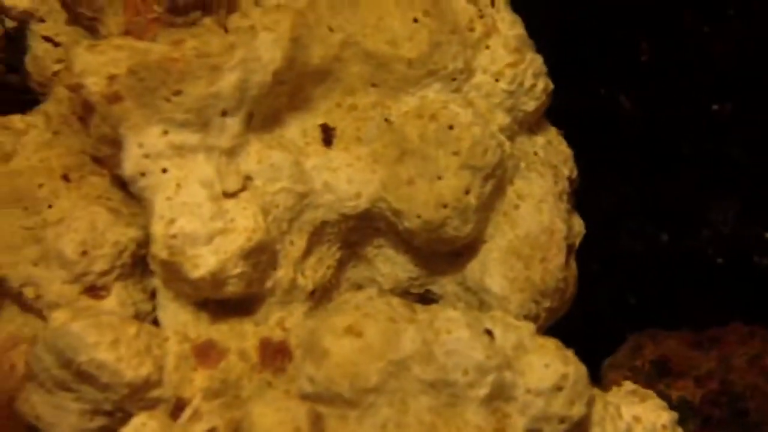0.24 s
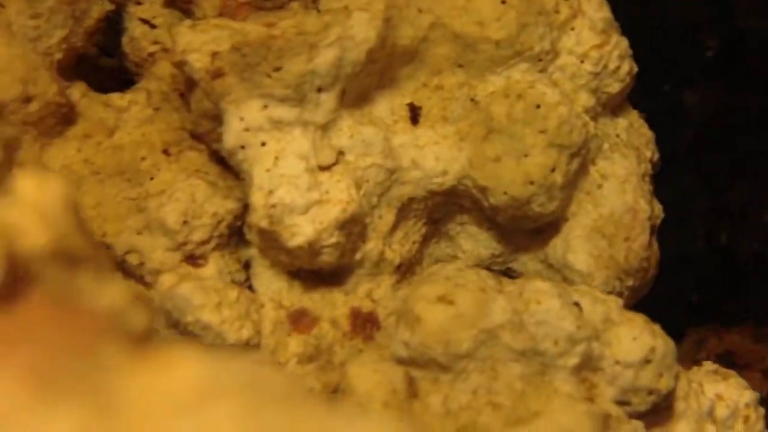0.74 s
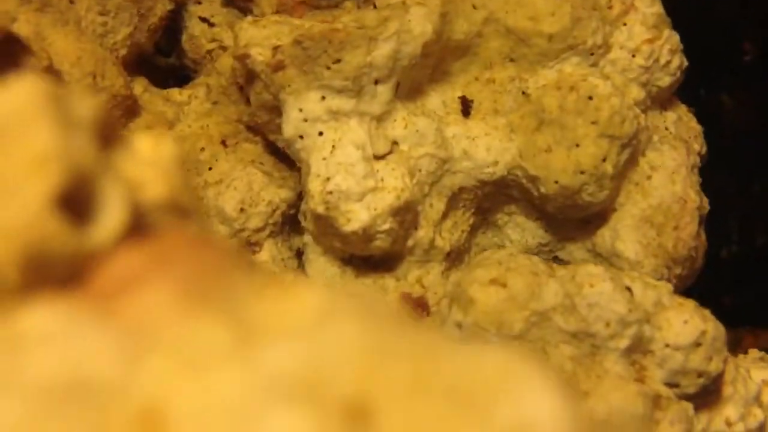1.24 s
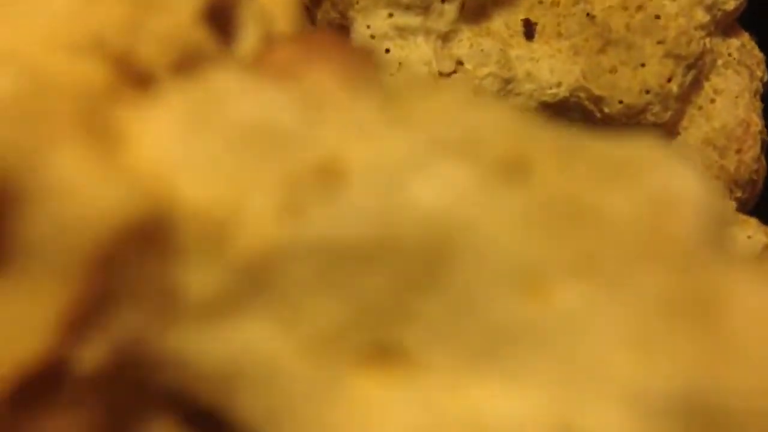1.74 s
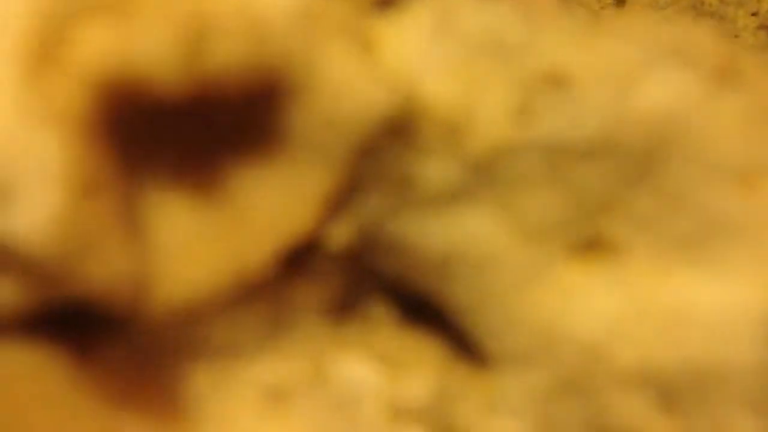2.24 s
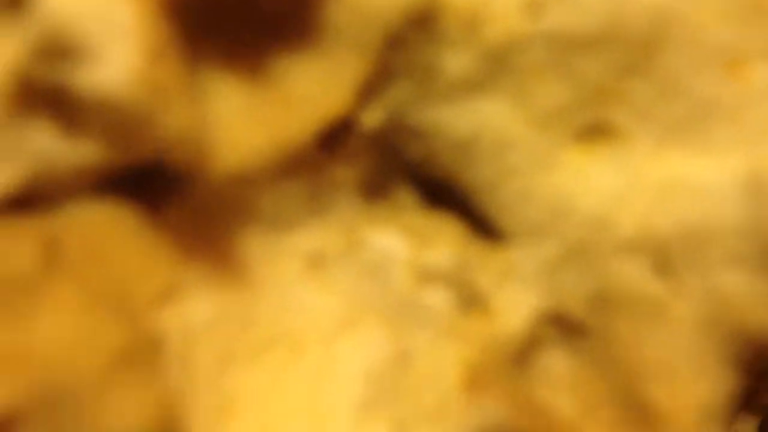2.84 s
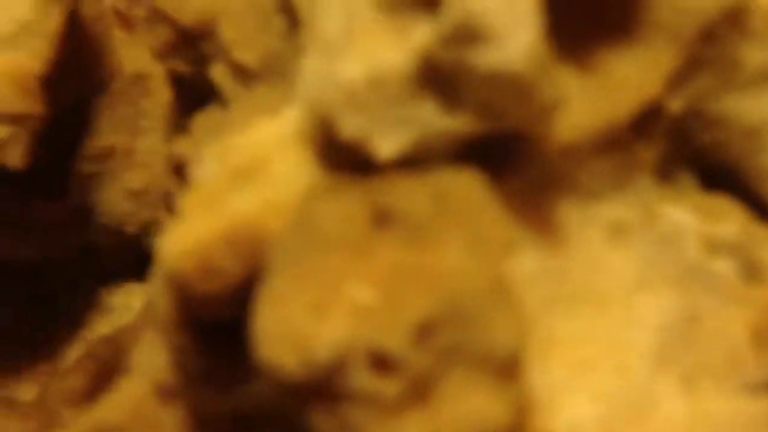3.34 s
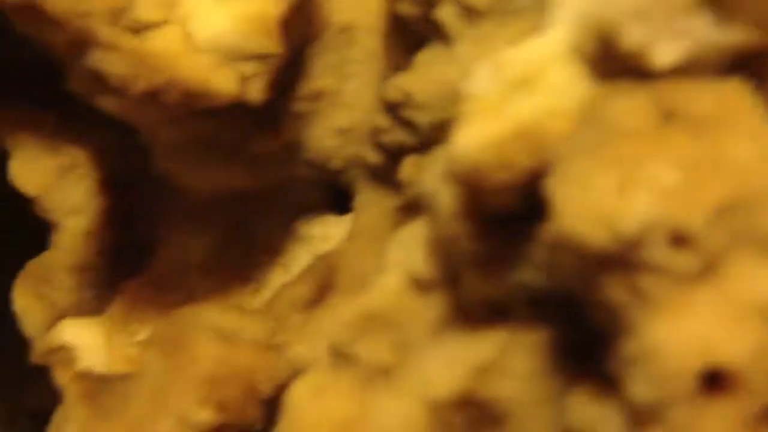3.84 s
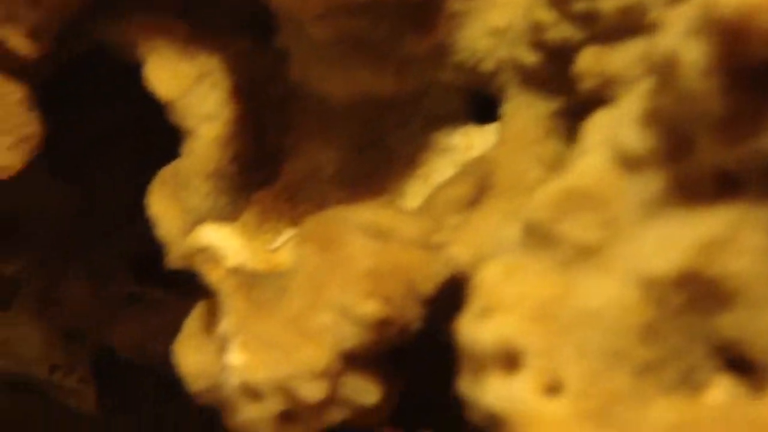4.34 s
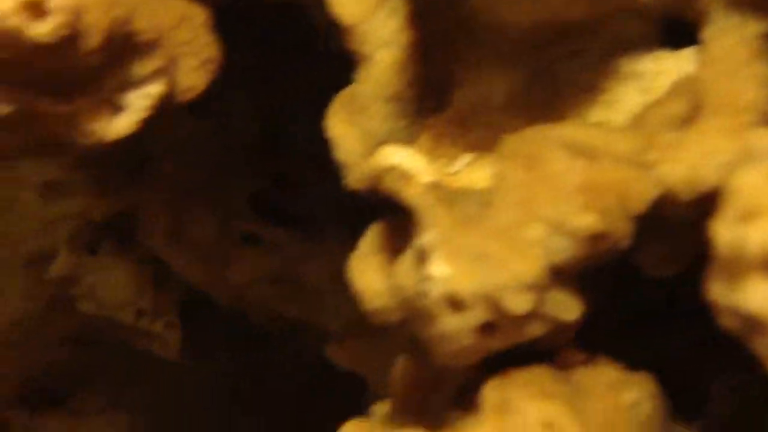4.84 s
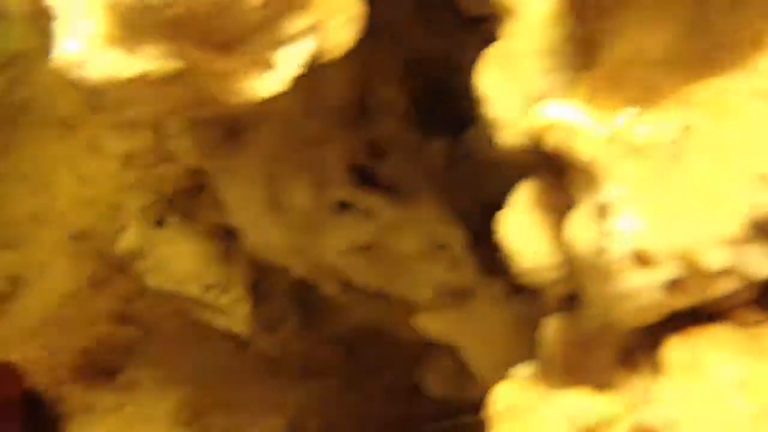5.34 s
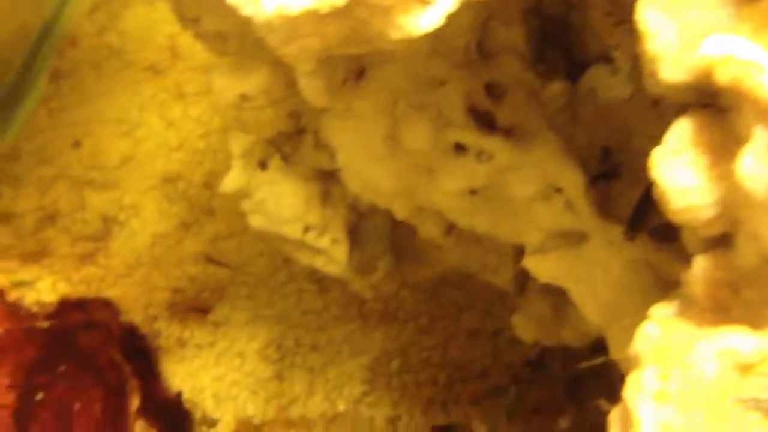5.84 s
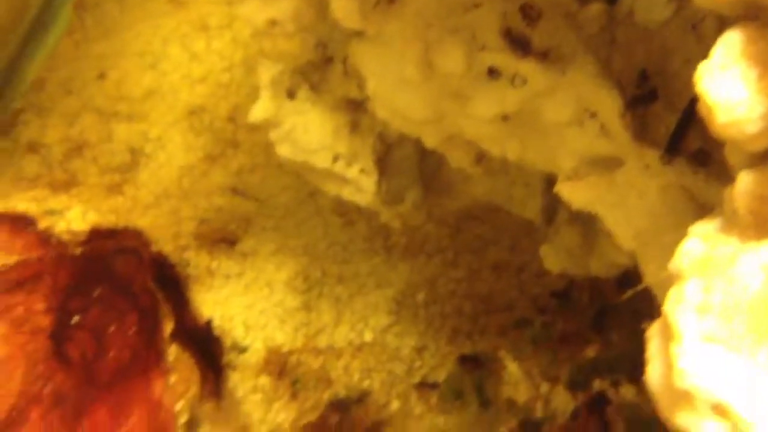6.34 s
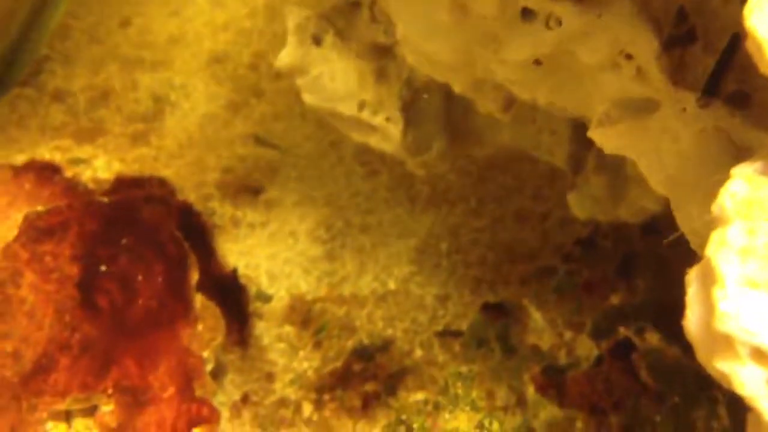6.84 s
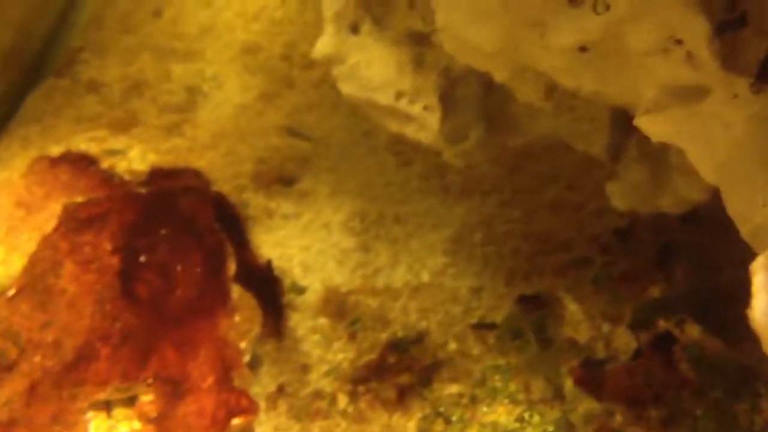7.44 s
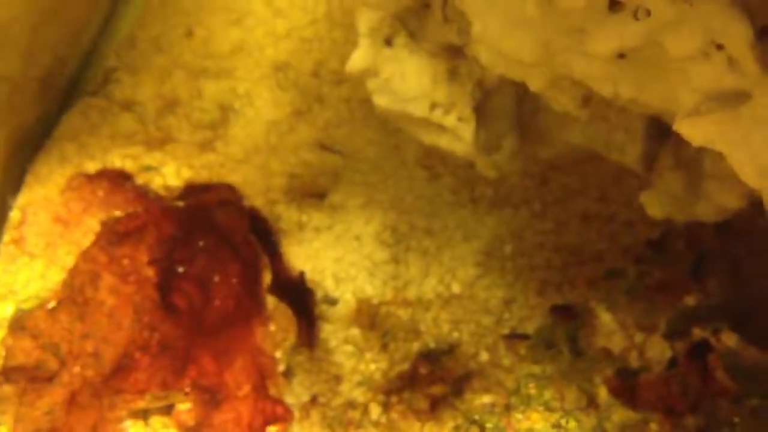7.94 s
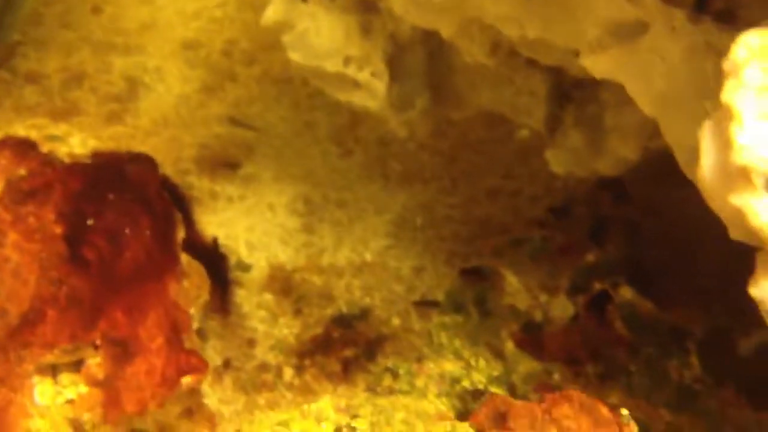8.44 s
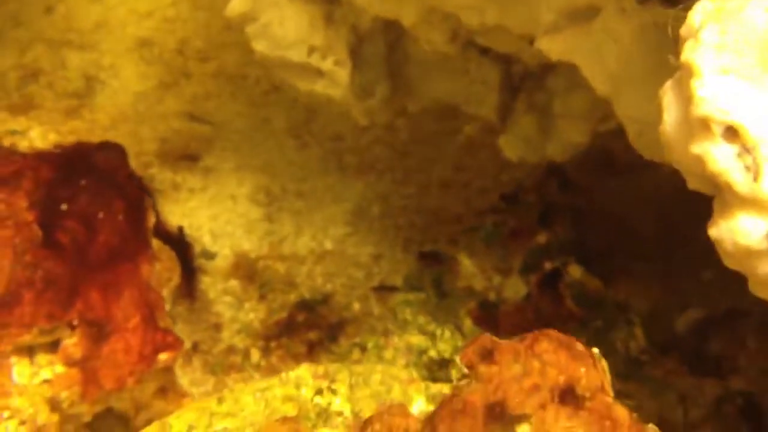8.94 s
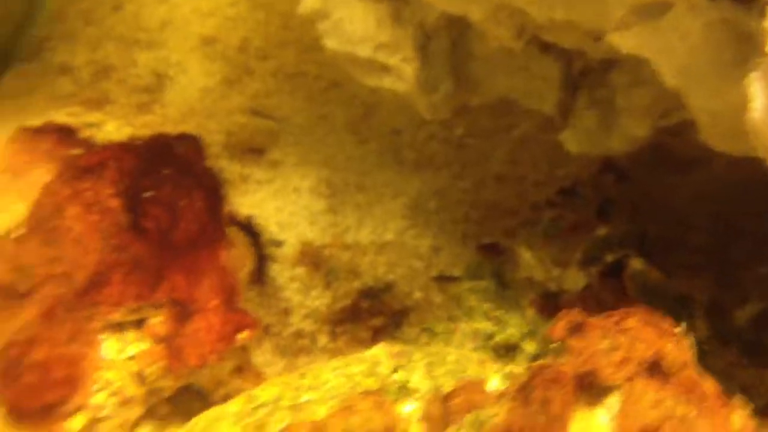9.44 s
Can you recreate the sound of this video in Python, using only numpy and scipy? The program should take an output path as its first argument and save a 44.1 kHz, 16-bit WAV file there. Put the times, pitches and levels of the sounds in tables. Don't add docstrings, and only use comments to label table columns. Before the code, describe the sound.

Inside a rock-filled water tank, a steady low mains hum and dull rushing flow surround a sealed underwater microphone. A rotor ticks very rapidly, with irregular sharper clicks. The water gradually gets louder and fuller, a few gurgles and bubbly knocks appear midway, and in the last second hollow, thumping turbulence drums hard on the housing.

```python
import sys
import numpy as np
from scipy import signal
from scipy.fft import rfft, irfft, next_fast_len
from scipy.io import wavfile
from scipy.ndimage import uniform_filter1d, map_coordinates

SR = 44100
rng = np.random.default_rng(int(sys.argv[2]) if len(sys.argv) > 2 else 0)


def elevation(decibels):
    levels = np.asarray(decibels, float)
    return 10 ** (levels / 20)


def transcribe(u):
    v = np.clip(np.atleast_2d(u).T, -1, 1)
    q = np.round(v * 32767).astype(np.int16)
    wavfile.write(sys.argv[1], SR, q)


N = 426888

MAINS_HZ = 59.9945
MAINS_START = 0.2
POCKET_HZ = 1075

# t/s, 2nd mains multiple level/dB, standing wave of the 4th over it level/dB
PUMP_HUM = [(0, -43, -15), (.8, -42.5, -12.5), (1.2, -42, -9), (2.5, -40, -9), (3.7, -41, -8),
            (4.4, -39, -8), (4.85, -37.5, -20.5), (5.5, -34.5, -8.5), (6.3, -34.5, -7.5), (7.2, -33.5, -5),
            (7.9, -33, -14), (9.3, -32, -9), (9.68, -38.5, 8.5)]
# mains multiple, level/dB
WEAK_HUM = [(3, -55), (8, -58), (9, -56.5)]

# t/s, drumming on the housing level/dB
DRUMMING = [(0, -71), (2.8, -62), (3.6, -58), (4.3, -55), (5, -47.5), (5.8, -46), (6.4, -41.5),
            (7.2, -41.5), (7.7, -39.5), (8.25, -35), (8.7, -31.5), (8.9, -24.5), (9.12, -24), (9.38, -16.5),
            (9.56, -21.5), (9.68, -23)]
# f/Hz, level/dB per Hz
DRONE_COLOUR = [(20, -45.5), (43, -41.5), (65, -15), (90, -15.5), (150, -3.5), (200, -3), (270, -6.5),
                (345, -12.5), (430, -7), (505, -3), (600, -9), (967, -34), (2500, -53.5), (4000, -110)]
# f/Hz, level/dB per Hz
FLOW_COLOUR = [(12, -64.5), (20, -31), (63, -26.5), (87, -22.5), (124, -10), (144, -9), (166, -7.5),
               (228, -2.5), (339, -14), (436, -11.5), (649, -7.5), (889, -29.5), (1100, -27.5),
               (1930, -52.5), (3000, -61.5), (3900, -88.5), (6600, -120)]
# f/Hz, level/dB per Hz
DRUM_COLOUR = [(12, -76.5), (20, -48), (65, -41), (84, -41.5), (109, -22), (161, -17.5), (223, -13),
               (271, -14), (360, -4.5), (509, -7), (593, 0), (737, -8), (916, -39), (1580, -40.5),
               (3600, -68), (4680, -92), (7920, -120)]

# place in the turn 0-1, ring level/dB, edge level/dB
CONTACTS = [
    (.14, 0, 0),
    (.42, -9, -16),
    (.645, 0, -6),
    (.83, -5, -9),
]
HARD_SHARE = [.24, .02, .08, .02]
# t/s, ring level/dB, openness of the path between the rocks level/dB
TICK_PATH = [(0, -68, -3.5), (1.6, -66, -0.5), (3, -62.5, 5.5), (3.6, -62, 1.5), (4.4, -60.5, 10.5),
             (5.3, -64, 12.5), (6.4, -60.5, 14), (7, -62.5, 12.5), (8.6, -61.5, 13.5), (9.68, -63, 12)]
# t/s, ring level/dB, edge level/dB
HARDEST_TICKS = [(0.416, -45, -51), (0.516, -43, -50), (0.5987, -41, -49), (1.133, -39, -51),
                 (1.2995, -40, -52), (1.9826, -41.5, -48), (2.1824, -37.5, -53), (2.3821, -36.5, -50),
                 (2.933, -39, -53), (3.666, -38.5, -54), (4.0999, -36, -56), (4.5159, -33.5, -44),
                 (4.6155, -38, -47.5), (4.8493, -34.5, -43), (4.933, -36, -43), (5.0322, -38, -44),
                 (5.2497, -37, -42.5), (6.0235, -34, -46), (6.4494, -38, -38.5), (6.5492, -35, -41),
                 (6.599, -46, -43), (6.7674, -41, -43), (7.7999, -39, -42), (8.1824, -43, -42),
                 (8.2987, -39, -42), (8.5166, -37, -47), (8.799, -35, -41), (8.8492, -32, -40),
                 (9.266, -37.5, -42), (9.3656, -42, -42.5)]
# t/s, level/dB
HOUSING_SHAKE = [(0, -79), (.5, -74), (.9, -79), (3.4, -75), (3.75, -61.5), (4.25, -67), (4.5, -58),
                 (5.9, -54), (6.3, -56.5), (6.6, -46), (6.75, -59), (7.2, -50.5), (7.55, -59), (7.8, -43),
                 (8.3, -49), (8.5, -57), (8.85, -46), (9.68, -52.5)]
# f/Hz, width/Hz, level/dB
RING_MODES = [(3710, 550, -16), (4802, 660, -2.5), (5053, 390, 0), (5935, 1210, -6), (7570, 630, -22.5)]
# f/Hz, width/Hz, level/dB
EDGE_MODES = [(7980, 380, -5.5), (8840, 320, -2.5), (9510, 690, -3.5), (10790, 1130, -4)]
# f/Hz, width/Hz, level/dB
SPARK_MODES = [(11060, 900, -8), (14800, 1500, -10)]
# f/Hz, level/dB
THUD_COLOUR = [(40, -18), (100, -21), (600, -8.5), (1080, 10), (1550, -8), (2400, -35), (3200, -35.5),
               (5000, -81.5)]
# f/Hz, width/Hz, level/dB
PANEL_MODES = [(1397, 190, 7.5), (1640, 83, 2.5), (2410, 210, -3), (3120, 350, -19)]

# t/s, level/dB, f/Hz
WATER_LUMPS = [(.493, -27, 193), (.545, -27, 294), (2.302, -29, 244), (4.752, -25.5, 204),
               (5.923, -25.5, 231), (5.985, -24.5, 261), (6.041, -18.5, 244), (6.806, -22, 242),
               (7.121, -19, 221), (7.272, -16, 233), (7.731, -21.5, 574), (8.0, -24, 570),
               (8.415, -15, 583), (8.473, -17.5, 584), (8.738, -22, 608), (8.787, -12.5, 621),
               (8.892, -12, 592), (9.025, -42.5, 1580), (5.938, -51, 1510), (9.146, -7.5, 579),
               (9.193, -7.5, 608), (9.316, -8.5, 616), (9.362, -3.5, 598), (9.418, -9, 603),
               (9.462, -15, 312), (9.47, -58, 2760), (9.514, -7.5, 481), (9.532, -1, 577),
               (9.536, -43, 1670)]
# t/s, level/dB
GURGLES = [(4.43, -50), (4.664, -50), (5.063, -48), (5.246, -45), (5.513, -48), (5.974, -43), (6.207, -36),
           (6.82, -42), (6.865, -38.5), (7.11, -39), (7.496, -37), (7.6, -39), (7.747, -37), (8.782, -43),
           (8.915, -39), (9.357, -28.5)]
# f/Hz, level/dB per Hz
BUFFET_COLOUR = [(12, -9), (25, -1.5), (45, 4), (80, -28), (150, -76)]
# f/Hz, level/dB per Hz
HISS_COLOUR = [(800, -14), (2000, -5), (3400, -3.5), (7000, 2), (8300, -4.5), (10000, -6), (11800, -8),
               (13000, -3), (15200, -4), (15500, -28)]


def hum():
    turn = 2 * np.pi * (MAINS_HZ * np.arange(N) / SR + MAINS_START)
    second_db, standing_db = curves(PUMP_HUM)
    _, flow_db, drum_db = stream()
    lines = [
        (4, second_db + standing_db),
        (5, summed(flow_db - 10.5, drum_db - 15.5)),
        (6, summed(-55, drum_db - 8.5)),
        (10, drum_db - 9.5),
    ] + WEAK_HUM
    total = elevation(second_db) * np.cos(2 * turn)
    for k, db in lines:
        level = elevation(db + 0.041 * k * k * wobble(6))
        phase = 0.013 * k * k * wobble(4) + rng.uniform(0, 2 * np.pi)
        total = total + level * np.cos(k * turn + phase)
    return np.sqrt(2) * total


def rotor(surge):
    ring_db, open_db = curves(TICK_PATH)
    place, ring_share, edge_share = np.transpose(CONTACTS)
    turns = np.arange(int(N / SR * MAINS_HZ))[:, None]
    jitter = 0.022 * rng.standard_normal((len(turns), len(place)))
    s = (turns + place - MAINS_START + jitter) / MAINS_HZ
    force_db = np.clip(5 * rng.standard_normal(s.shape), -12, 5)
    colour_db = (2.5 * rng.standard_normal(s.shape)).ravel()
    ring_force = (force_db + ring_share).ravel()
    edge_force = (1.2 * force_db + edge_share).ravel()
    s = s.ravel()

    ring_hits = scrapes(s, ring_force, length=0.0055, slide_db=-31)
    edge_hits = scrapes(s, edge_force + colour_db, length=0.003, slide_db=-17.5)
    spark_hits = scrapes(s, 1.2 * ring_force + 0.4 * colour_db, length=0.003)
    ring = unit(filtered(ring_hits, modes(RING_MODES)))
    edge = unit(filtered(edge_hits, modes(EDGE_MODES)))
    spark = unit(filtered(spark_hits, modes(SPARK_MODES)))
    fade = elevation(1 - 1.1 * open_db)
    soft = elevation(ring_db) * ring + elevation(open_db - 83.5) * edge + fade * elevation(-81) * spark

    thud_hits = scrapes(s + 0.00151, ring_force - colour_db, length=0.0065)
    panel_hits = scrapes(s + 0.0015, (ring_force + colour_db) * 0.99, length=0.023)
    thud = unit(filtered(thud_hits, thud_response))
    panel = unit(filtered(panel_hits, modes(PANEL_MODES)))
    thud_db = curves(HOUSING_SHAKE)[0] + 2.5 * wobble(7)
    body = elevation(thud_db - 5) * thud + elevation(stream()[2] - 33) * panel

    return surge * body + soft + hard_knocks(fade, thud_db)


def hard_knocks(fade, thud_db):
    s, db, bright_db = hard_ticks()
    ring_hits = spikes(s, elevation(db + 23)) + scrapes(s, db + 7, length=0.0018)
    edge_hits = spikes(s + 0.0003, elevation(bright_db + 23.5)) + scrapes(s, bright_db + 8.5, length=0.0015)
    ring = filtered(ring_hits, modes(RING_MODES))
    edge = filtered(edge_hits, modes(EDGE_MODES))
    spark = fade * filtered(scrapes(s, bright_db + 12.5, length=0.0023), modes(SPARK_MODES))
    thud = elevation(thud_db + 67.5) * filtered(spikes(s + 0.0015, elevation(db)), thud_response)
    return spark + ring + edge + thud


def hard_ticks():
    turns = np.arange(int(N / SR * MAINS_HZ))[:, None]
    shape = (len(turns), len(CONTACTS))
    struck = rng.random(shape) < HARD_SHARE
    place, _, edge_share = np.transpose(CONTACTS)
    s = (turns + place - MAINS_START) / MAINS_HZ
    t, ring_db, open_db = np.transpose(TICK_PATH)
    db = np.interp(s, t, ring_db) + 18.5 + 3 * rng.standard_normal(shape)
    bright_db = -57 + 0.59 * np.interp(s, t, open_db) + edge_share + 3 * rng.standard_normal(shape)
    return np.hstack([np.transpose(HARDEST_TICKS), [s[struck], db[struck], bright_db[struck]]])


def water(surge):
    drone_db, flow_db, drum_db = stream()
    push = elevation(1.5 * np.cos(2 * np.pi * (MAINS_HZ * np.arange(N) / SR + 0.16)))
    drone = elevation(drone_db) * rush(DRONE_COLOUR, patchy_db=2.0)
    flow = elevation(flow_db) * rush(FLOW_COLOUR, patchy_db=1.0)
    drumming = elevation(drum_db) * rush(DRUM_COLOUR, patchy_db=1.5)
    return surge * push * (drone + flow + drumming)


def stream():
    drum_db, = curves(DRUMMING)
    drone_db = -45.5 - 0.49 * past(drum_db, -54)
    flow_db = -32.5 - 1.49 * past(-drum_db, 43.5) - 0.12 * past(drum_db, -43.5)
    return drone_db, flow_db, drum_db


def lumps():
    out = np.zeros(N + SR)
    t = np.arange(SR // 5) / SR
    rings = WATER_LUMPS + [(s, db, POCKET_HZ) for s, db in GURGLES]
    for s, db, hz in rings:
        swell = 0.00709 * (hz / 600) ** 0.37
        start = round((s - swell) * SR)
        shape = t / swell * np.exp(1 - t / swell)
        out[start:][:len(t)] += elevation(db - 5.5) * shape * np.sin(2 * np.pi * hz * t)
    s, db, hz = np.transpose(rings)
    splash_db = db - 16.5 - 19 * (hz < 800)
    return out[:N] + filtered(scrapes(s, splash_db, length=0.025), modes(PANEL_MODES))


def buffet():
    thumps = elevation(6.5 * wobble(16)) * rush(BUFFET_COLOUR, patchy_db=5.5)
    return elevation(1.74 * curves(PUMP_HUM)[0] - 12) * unit(thumps)


def hiss():
    return elevation(-70) * rush(HISS_COLOUR, patchy_db=1.4)


def rush(colour, patchy_db):
    z = signal.stft(rng.standard_normal(N + SR), nperseg=1024)[2]
    field = uniform_filter1d(rng.standard_normal(z.shape), size=5, axis=0)
    field = uniform_filter1d(field, size=3, axis=1)
    noise = signal.istft(z * elevation(patchy_db * unit(field)), nperseg=1024)[1][:N]
    return unit(filtered(noise, lambda hz: elevation(along(colour, hz))))


def scrapes(s, db, length, slide_db=-99):
    t = np.arange(SR // 100) / SR
    bursts = signal.oaconvolve(spikes(s, elevation(db)), elevation(-60 * t / length))[:N]
    return (bursts + elevation(slide_db)) * rng.standard_normal(N)


def spikes(s, size):
    place = np.clip(np.round(s * SR).astype(int), 0, N - 1)
    return np.bincount(place, size, N)


def modes(table):
    def response(f):
        total = 0
        for k, (centre, width, db) in enumerate(table):
            peak = 1j * f * width / (centre * centre - f * f + 1j * f * width)
            total = total + (-1) ** k * elevation(db) * peak ** 2
        return total
    return response


def thud_response(hz):
    return elevation(along(THUD_COLOUR, hz))


def filtered(x, response):
    m = next_fast_len(N + SR // 10, True)
    return irfft(rfft(x, m) * response(np.fft.rfftfreq(m, 1 / SR)), m)[..., :N]


def wobble(rate):
    return map_coordinates(rng.standard_normal(SR // 200), [np.arange(N) * rate / SR])


def curves(rows):
    s, *columns = np.transpose(rows)
    return [np.interp(np.arange(N) / SR, s, column) for column in columns]


def along(points, hz):
    f, value = np.transpose(points)
    return np.interp(np.log(hz + 1), np.log(f + 1), value)


def past(db, knee_db):
    return 3 * np.logaddexp(0, (db - knee_db) / 3)


def summed(a_db, b_db):
    return 10 * np.log10(elevation(2 * a_db) + elevation(2 * b_db))


def unit(x):
    return x / np.sqrt(np.mean(x ** 2) + 1e-20)


def scene():
    surge = elevation(0.79 * wobble(22))
    return (hum() + rotor(surge) + water(surge) + lumps() + buffet())[None]


def top_cut(x):
    return signal.sosfilt(signal.butter(12, 16300, fs=SR, output="sos"), x)


def record(dry):
    wet = filtered(dry + hiss(), lambda hz: hz < 15350)
    return top_cut(wet)


dry = scene()
out = record(dry)
transcribe(out)
```